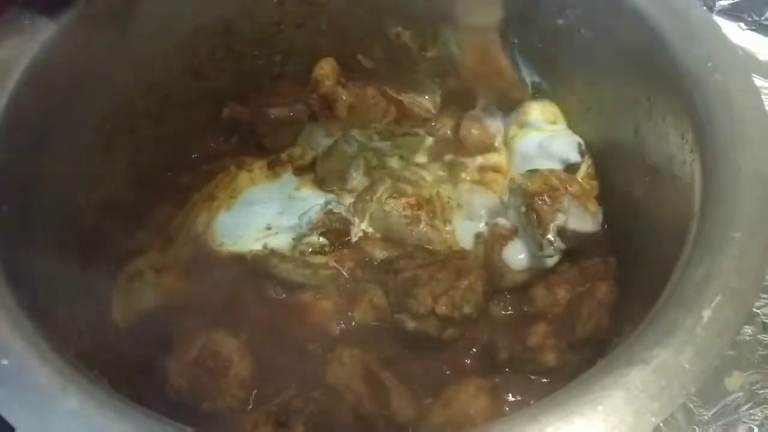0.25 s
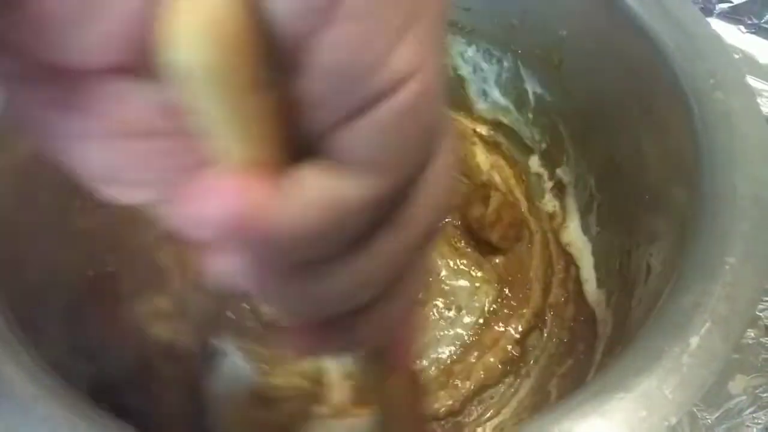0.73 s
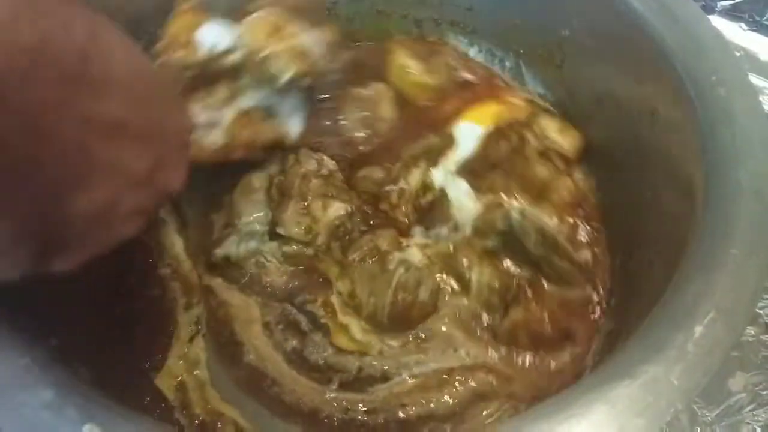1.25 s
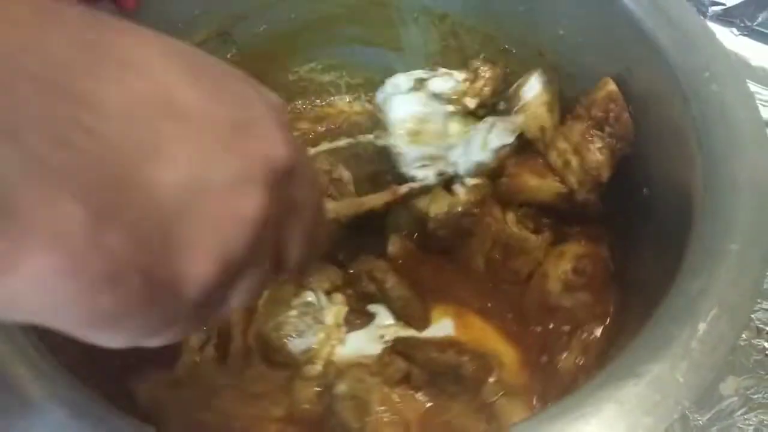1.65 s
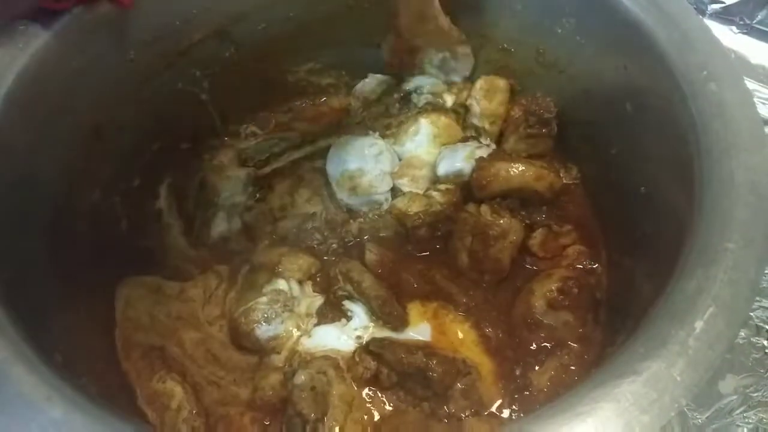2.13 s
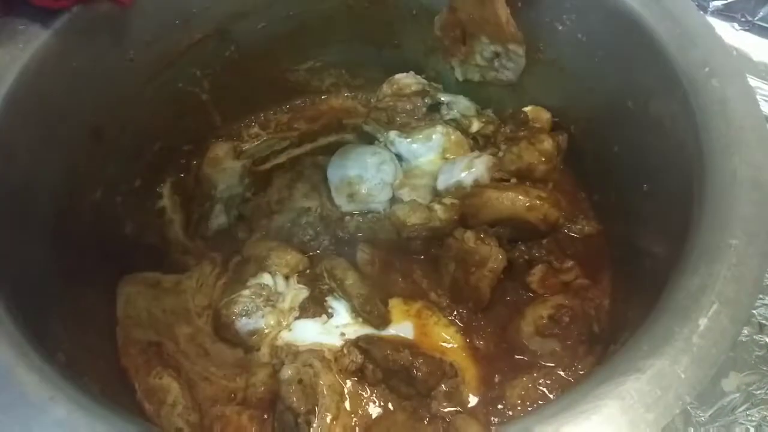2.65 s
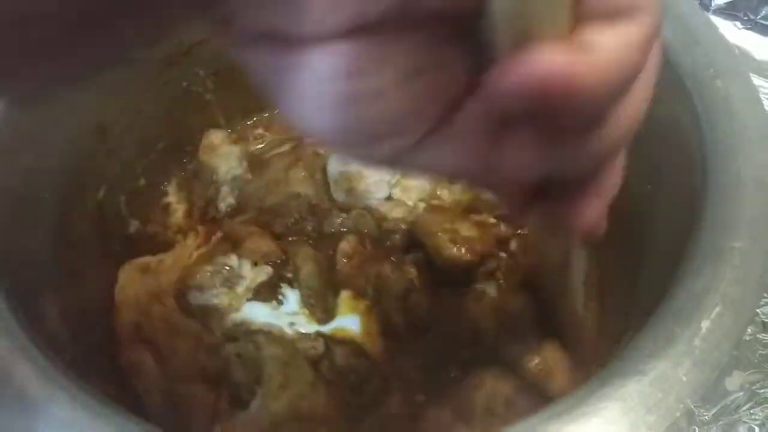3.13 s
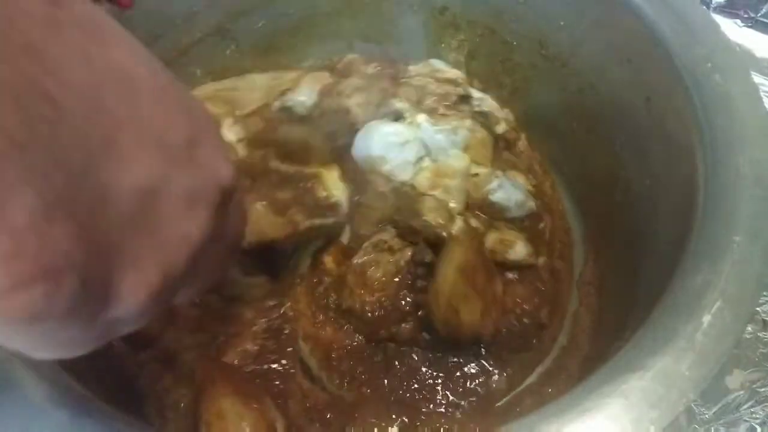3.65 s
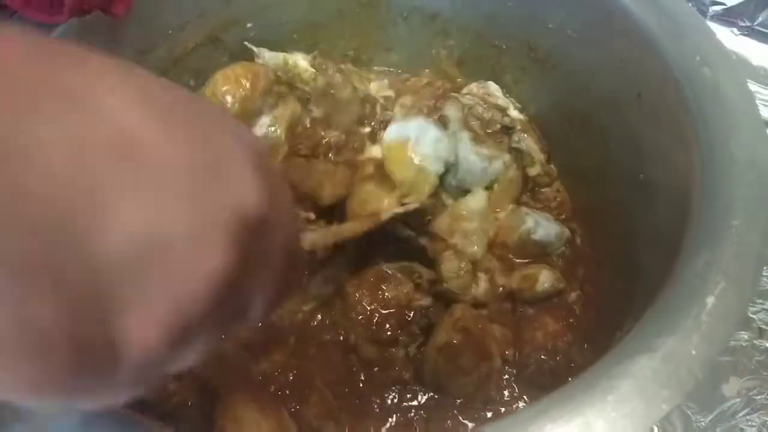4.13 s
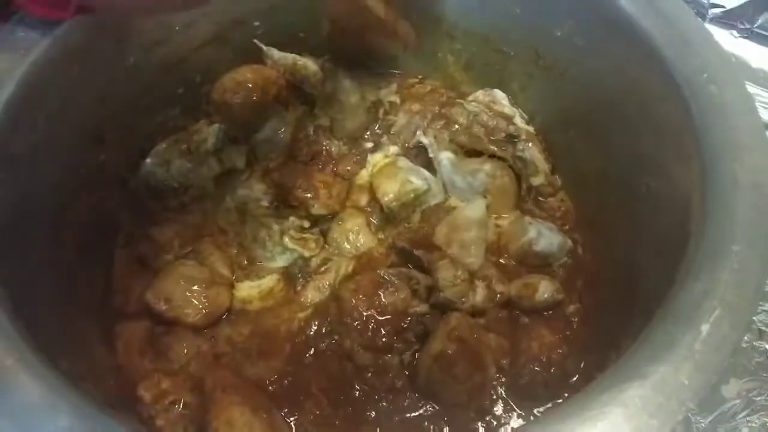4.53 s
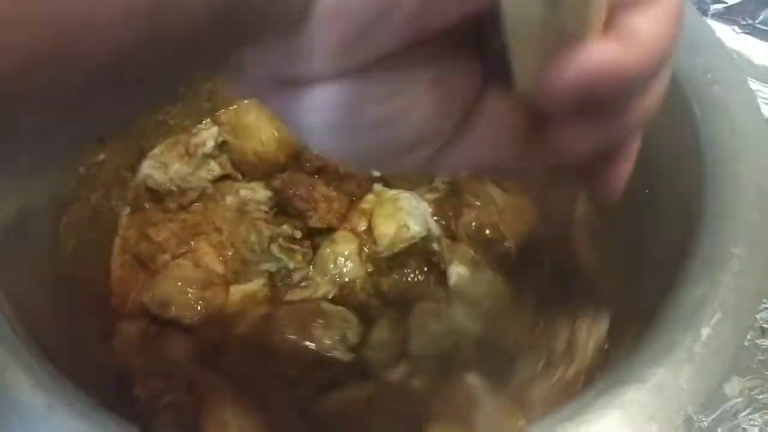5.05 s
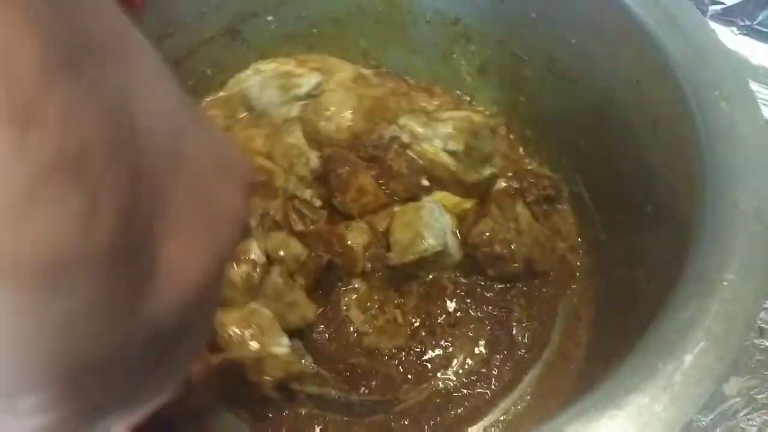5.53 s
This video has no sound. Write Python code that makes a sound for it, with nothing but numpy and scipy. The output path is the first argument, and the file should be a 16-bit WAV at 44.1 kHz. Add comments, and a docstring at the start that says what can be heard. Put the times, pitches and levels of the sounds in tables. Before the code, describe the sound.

A wooden spoon clacks and scrapes in a deep metal pot while thick meat curry sizzles, spits fat and bubbles wetly.

```python
"""In a small kitchen, a wooden spoon stirs a thick meat curry that sizzles in a deep metal pot on a stove.
The sizzle and the sliding lumps are coloured noise made of tiny bursts and brief bubble notes.
Taps, knocks and thumps are fading tones and noise; scrapes are a groan under a dry rasp.
Wet lumps plop and squelch, fat spits, large bubbles burst, and the room answers softly.
A camera with two microphone ports hangs just above the rim and turns it all into stereo."""
import sys
import numpy as np
from scipy import signal
from scipy.fft import rfft, irfft, next_fast_len
from scipy.io import wavfile
from scipy.ndimage import uniform_filter1d, map_coordinates

SR = 44100
rng = np.random.default_rng(int(sys.argv[2]) if len(sys.argv) > 2 else 0)


def output_pcm(signal):
    """Save a mono or channel-first signal as 16-bit PCM at the path in sys.argv[1].

    Samples are clipped to [-1, 1] before scaling.
    """
    pcm = np.clip(np.atleast_2d(signal).T, -1, 1) * 32767
    wavfile.write(sys.argv[1], SR, np.round(pcm).astype(np.int16))


N = 255773
TIME = np.arange(N) / SR  # the whole scene [s]
AGE = TIME[:SR // 3]  # time since one short event began [s]
TOP_HZ = 13100  # the camera passes nothing much higher


def amp(db):
    """Decibels to gain."""
    return 10 ** (np.asarray(db) / 20)


def unit(x):
    """Scaled to an average (rms) strength of 1."""
    return x / np.sqrt(np.mean(x ** 2) + 1e-20)


def along(points, hz):
    """Read a curve of (frequency [Hz], value) points on a log frequency axis."""
    f, v = np.transpose(points)
    return np.interp(np.log(hz + 1), np.log(f + 1), v)


def wobble(rate):
    """A smooth random curve with rate knots a second."""
    knots = rng.standard_normal(int(N * rate / SR) + 4)
    return map_coordinates(knots, [TIME * rate])


def filtered(x, response):
    """Reshape the spectrum of x by a response that depends on frequency."""
    m = next_fast_len(N + SR // 2)
    return irfft(rfft(x, m) * response(np.fft.rfftfreq(m, 1 / SR)), m)[..., :N]


def low_cut(x, hz):
    """A small body radiates little below hz."""
    return signal.sosfilt(signal.butter(3, hz, "high", fs=SR, output="sos"), x)


def add(track, s, sound):
    """Mix a sound into a track at s seconds."""
    part = track[..., round(s * SR):][..., :sound.shape[-1]]
    part += sound[..., :part.shape[-1]]


def fade(t60):
    """A decay that loses 60 dB in t60 seconds."""
    return np.exp(-np.log(1000) * AGE / t60)


def onset(rise):
    """A soft start with a time constant of rise seconds."""
    return 1 - np.exp(-AGE / rise)


def ring(modes, hardness_db, tuning=1):
    """Fading tones of a struck body, at new strengths each time; a harder blow favours the high ones."""
    hz, db, t60 = np.transpose(modes)[..., None]
    tilt_db = hardness_db * np.log2(hz / 500)
    strength = amp(db + tilt_db + rng.standard_normal(hz.shape))
    return np.sum(strength * fade(t60) * np.sin(2 * np.pi * hz * tuning * AGE), axis=0)


def surges(rows, t60, attack):
    """The level of short gushes that start fast and die away."""
    flow = np.zeros(N)
    for s, db in rows:
        add(flow, s, amp(db + 11.0) * fade(t60) * onset(attack))
    return flow


def gesture(start, end, rise, fall):
    """An envelope that rises from start, holds and dies away after end; rise and fall are time constants."""
    rising = 1 - np.exp(-np.maximum(TIME - start, 0) / rise)
    return rising * np.exp(-np.maximum(TIME - end, 0) / fall)


# air resonances of the open pot: (frequency [Hz], width [Hz], gain [dB])
AIR_IN_POT = [(404, 51, 8), (504, 28, -7), (851, 105, 9.5), (956, 250, -0.5), (1206, 140, 8.5),
              (1620, 400, 7.5), (1830, 49, 5), (2480, 41, 9), (2740, 120, 4.5)]


def in_pot(x, spectrum):
    """Noise given its own colour and that of the resonating air in the pot, at rms 1."""
    def colour_db(f):
        air_db = sum(db / (1 + (2 * (f - hz) / width) ** 2) for hz, width, db in AIR_IN_POT)
        return along(spectrum, f) + air_db
    return unit(filtered(x, lambda f: amp(colour_db(f))))


def crackle(rate, life, spread_db, share):
    """Tiny bursts, rate a second, each fading in life seconds, over a bed of steady noise, at both ports."""
    sizes = (rng.random(N) < rate / SR) * amp(spread_db * np.clip(rng.standard_normal(N), -2, 2))
    power = np.abs(signal.fftconvolve(sizes ** 2, fade(life) ** 2)[:N])
    # the share of the power that goes to the bursts
    share = np.clip(share, 0, 1)
    return rng.standard_normal((2, N)) * np.sqrt(1 - share + share * power / power.mean())


def froth(count, centre_hz, octaves, cycles):
    """Many small bubbles, each a brief note with its own pitch, and its own phase at each port."""
    starts = rng.integers(0, N, (count, 1))
    pitch, size = np.clip(rng.standard_normal((2, count, 1)), -2, 2)
    hz = centre_hz * 2 ** (octaves * pitch)
    t = AGE[AGE < 4 * cycles / centre_hz]
    decay = np.exp(-t * hz / cycles)
    shell = amp(2 * size) * np.sqrt(hz) * decay * (1 - np.exp(-t * hz))
    places = (starts + np.arange(len(t))).ravel()
    ports = [shell * np.sin(2 * np.pi * (hz * t + phase)) for phase in rng.random((2, count, 1))]
    return np.array([np.bincount(places, notes.ravel(), N)[:N] for notes in ports])


def patchy(x, depth_db):
    """Bubbles come in clusters, so each pitch region swells and sinks by itself."""
    z = signal.stft(x, nperseg=512)[2]
    field = rng.standard_normal(z.shape[1:])
    field = uniform_filter1d(field, size=7, axis=0)  # smooth over frequency
    field = uniform_filter1d(field, size=8, axis=1)  # smooth over time
    swollen = z * amp(depth_db * unit(field))
    return unit(signal.istft(swollen, nperseg=512)[1][:, :N])


# how hard the curry fries: (time [s], heat [dB])
FRYING_HEAT = [(0, -7), (.4, -5.5), (1.25, -9.5), (1.85, -3.5), (2.85, -3), (3.7, -0.5), (5.8, 0.5)]
# the spoon ploughs through the food:
# (start [s], end [s], lift of the sauce's sounds [dB], lift of the fizz [dB])
SPOON_STROKES = [(0.44, 1.058, 7.5, 10), (1.942, 2.637, 3.5, 4.5), (2.909, 3.468, 3.5, 2),
                 (5.03, 5.7, 0.5, 5)]
STROKE_RISE_S, STROKE_SETTLE_S = 0.17, 0.051  # the food gets moving, and comes to rest


def stirring():
    """The heat, and how far the moving food lifts the sauce's sounds and the fizz, all in dB."""
    heat_db = np.interp(TIME, *np.transpose(FRYING_HEAT))
    start, end, sauce_db, fizz_db = np.transpose(SPOON_STROKES)[..., None]
    moving = gesture(start, end, STROKE_RISE_S, STROKE_SETTLE_S)
    return heat_db, np.sum(sauce_db * moving, axis=0), np.sum(fizz_db * moving, axis=0)


# colour of the simmer: (frequency [Hz], level [dB])
SIMMER_COLOUR = [(150, -45), (400, -2.5), (700, -4), (1300, -8.5), (2000, -9.5), (2700, -2), (4500, -4),
                 (8000, -12.5), (13000, -33)]
SIMMER_DB, SIMMER_GROWS = -43, 1.03  # level at 0 dB of heat; dB gained per dB of heat


def simmer():
    """Steam breaks through the sauce as soft crackle, with a burble of low bubble notes."""
    heat_db, stirred_db, _ = stirring()
    level_db = SIMMER_DB + SIMMER_GROWS * heat_db + stirred_db + 0.75 * wobble(25)
    steam = unit(crackle(rate=600, life=.007, spread_db=4, share=.38))
    burble = unit(froth(count=1800, centre_hz=1100, octaves=.5, cycles=6))
    return amp(level_db) * in_pot(patchy(steam + .28 * burble, depth_db=1.2), SIMMER_COLOUR)


# colour of the fizz: (frequency [Hz], level [dB])
FIZZ_COLOUR = [(500, -7.5), (1800, -11), (3000, -7), (5300, -3), (7500, -5), (11000, -3.5), (13000, -6.5)]
# fresh sauce runs onto hot metal: (time [s], relative level [dB])
HISS_FLARES = [(1.16, -72), (3.255, -48), (4.295, -45), (4.44, -48), (4.7, -47), (4.97, -66), (5.35, -35),
               (5.39, -41), (5.585, -41)]
FIZZ_DB, FIZZ_GROWS = -41, 1.38  # level at 0 dB of heat; dB gained per dB of heat


def fizz():
    """Fat fizzes where the spoon bares hot metal: hiss and high bubble notes, with flares of fresh sauce."""
    heat_db, _, bared_db = stirring()
    level_db = FIZZ_DB + FIZZ_GROWS * heat_db + bared_db + 1.8 * wobble(30)
    hiss = unit(crackle(rate=900, life=.004, spread_db=5.5, share=.35))
    beads = unit(froth(count=7000, centre_hz=4200, octaves=.75, cycles=5))
    pips = unit(froth(count=260, centre_hz=3200, octaves=.3, cycles=5))
    fat = in_pot(patchy(hiss + .58 * beads + .28 * pips, depth_db=2.1), FIZZ_COLOUR)
    flares = surges(HISS_FLARES, t60=0.21, attack=0.006)
    return np.hypot(amp(level_db), flares) * fat


# colour of the sliding lumps: (frequency [Hz], level [dB])
SLUSH_COLOUR = [(20, -40), (60, -39), (120, -10.5), (200, -7.5), (290, 3.5), (420, -4.5), (700, -5.5),
                (1500, -33)]
# a lump of meat flops over: (time [s], relative level [dB])
MEAT_FLOPS = [(.495, -52.5), (1.905, -42), (2.12, -56), (2.76, -51), (3.215, -47.5), (5.38, -61)]
SLOP_DB, SLOP_GROWS = -44.5, 1.2  # level at 0 dB of heat; dB gained per dB of heat


def slop():
    """Lumps of meat slide in the sauce as low, wet crackle, and now and then one flops over."""
    heat_db, stirred_db, _ = stirring()
    sliding = amp(SLOP_DB + SLOP_GROWS * heat_db + 0.85 * stirred_db)
    flopping = surges(MEAT_FLOPS, t60=0.53, attack=0.0071)
    lumps = crackle(rate=150, life=.03, spread_db=3, share=.25)
    return np.hypot(sliding, flopping) * in_pot(lumps, SLUSH_COLOUR)


# the spoon meets the wall: (time [s], clack relative level [dB], contact muffled above [Hz],
# clack t60 [s], note of the wood [Hz], its relative level [dB],
# main note of the wall at that spot [Hz], its ring relative level [dB])
SPOON_TAPS = [(0.421, -40, 12100, 0.025, 3000, -50, 675, -52),
              (0.5087, -23.5, 16000, 0.013, 2700, -39, 688, -36),
              (0.9160, -16.5, 9900, 0.011, 3010, -31, 695, -50),
              (.9262, -31, 7000, 0.026, 3200, -39, 695, -45),
              (1.0889, -15.5, 17000, 0.015, 2910, -28.5, 612, -30.5),
              (1.586, -26.5, 14000, 0.041, 2940, -40, 650, -40),
              (1.6, -27.5, 15000, 0.02, 3180, -41, 624, -36),
              (1.6542, -25, 13800, 0.025, 2890, -34.5, 646, -45),
              (1.6635, -31, 11000, 0.02, 2900, -41, 627, -41.5),
              (1.909, -24.5, 5430, 0.052, 2547, -28, 650, -32.5),
              (2.56, -28, 13000, 0.023, 2780, -41, 613, -65),
              (2.6265, -22.5, 6860, 0.04, 3850, -34.5, 613, -47),
              (2.6365, -21, 4500, 0.01, 2630, -35.5, 610, -42)]
# colour of wood on metal: (frequency [Hz], level [dB])
CLACK_COLOUR = [(60, -74), (300, 8.5), (900, -9.5), (1800, -2.5), (2800, -3.5), (4000, 3), (5500, 1.5),
                (8000, -8), (13000, -6)]
# tones of the pot's wall, damped by the food: (frequency [Hz], level [dB], t60 [s])
WALL_MODES = [(195, -15, 0.084), (616.6, 1.5, 0.15), (705, 2, 0.05), (833, -6, 0.041), (1230, -4, 0.041),
              (1600, -19, 0.063), (2520, 2, 0.047), (2680, -14, 0.069), (2970, -13.5, 0.23),
              (3640, -8, 0.05), (3820, -14, 0.092)]
WALL_NOTE_HZ = 613  # the wall's main note where its tones are left untuned
WOOD_SWELL_S = 0.003  # the spoon's own note is loudest this long after the contact
# the spoon's second note, a little lower and louder: frequency ratio and level
WOOD_SECOND_NOTE, WOOD_SECOND_NOTE_DB = 0.92, 5.5


def taps():
    """Each contact is a sharp snap and a short clack, then the brief notes of the wood and a ring of the wall."""
    clacks, rings = np.zeros((2, N)), np.zeros(N)
    swell = (AGE / WOOD_SWELL_S * np.exp(1 - AGE / WOOD_SWELL_S)) ** 2
    for s, clack_db, muffle_hz, t60, wood_hz, wood_db, wall_hz, ring_db in SPOON_TAPS:
        # a quick burst of noise with a faint tail
        burst = (fade(t60) + amp(-29) * fade(0.036)) * onset(0.0004)
        clack = burst * rng.standard_normal((2, len(AGE)))
        # the snap reaches the near (right) port directly
        add(clack, .0013, np.array([[.5], [2.6]]))
        # sauce on the spoon softens the contact
        softening = signal.butter(2, min(muffle_hz, SR / 2 - 1), fs=SR, output="sos")
        add(clacks, s, amp(clack_db + 6.0) * signal.sosfilt(softening, clack))
        phase = 2 * np.pi * wood_hz * AGE
        wood = np.sin(phase) + amp(WOOD_SECOND_NOTE_DB) * np.sin(WOOD_SECOND_NOTE * phase)
        add(rings, s, amp(wood_db) * swell * wood)
        # food clinging to the wall shifts its tones from spot to spot
        wall = ring(WALL_MODES, hardness_db=-0.5, tuning=wall_hz / WALL_NOTE_HZ)
        add(rings, s, amp(ring_db) * wall)
    return filtered(clacks, lambda f: amp(along(CLACK_COLOUR, f))) + rings


# the spoon is dragged along the wall: (start [s], end [s], groan relative level [dB],
# rasp relative level [dB], first stick-slip rate [Hz])
SPOON_DRAGS = [(1.9, 1.938, -30, -34, 690.2), (1.943, 1.966, -26, -32.5, 629.5),
               (1.974, 1.995, -15, -29.5, 630.4), (3.005, 3.038, -45, -38.5, 687.3),
               (3.062, 3.155, -34, -42, 663), (3.191, 3.294, -49, -43.5, 636)]
DRAG_ATTACK_S, DRAG_RELEASE_S = 0.013, 0.014
GROAN_SWELL_DB, SAG_HZ_PER_S = 9, 400  # as the wood bites, the groan swells and its slips slow down


def dragging():
    """Strength of the groan, strength of the rasp and stick-slip rate over all drags."""
    groan, rasp, slip_hz = np.zeros(N), np.zeros(N), np.zeros(N)
    for start, end, groan_db, rasp_db, hz in SPOON_DRAGS:
        contact = gesture(start, end, DRAG_ATTACK_S, DRAG_RELEASE_S)
        elapsed = np.clip(TIME, start, end) - start
        swell_db = GROAN_SWELL_DB * (elapsed / (end - start) - 1.5)
        groan += contact * amp(groan_db + swell_db)
        rasp += contact * amp(rasp_db)
        slip_hz = np.where(TIME >= start, hz - SAG_HZ_PER_S * elapsed, slip_hz)
    return groan, rasp, slip_hz


# extra colour of the rasp: (frequency [Hz], level [dB])
RASP_COLOUR = [(1200, -19), (2400, 10.5), (3300, 5.5), (5000, -1), (12000, -8)]
HUM_DB = -0.5  # the pot's hum over the rasp


def scrape():
    """Wood sticks and slips along the wall: a wavering groan under a dry rasp that sets the pot humming."""
    groan_gain, rasp_gain, slip_hz = dragging()
    phase = 2 * np.pi * np.cumsum(slip_hz * (1 + .025 * wobble(200))) / SR
    groan = np.sqrt(2) * np.sin(phase) * amp(1.6 * wobble(130))
    # the crackle of the slips pulses in step with the groan
    slips = crackle(rate=600, life=.004, spread_db=3, share=.5) * (1 + .5 * np.sin(phase))
    hum = unit(signal.fftconvolve(slips[0], ring(WALL_MODES, hardness_db=-7.5))[:N])
    dry_slips = low_cut(in_pot(slips, CLACK_COLOUR), hz=1000)
    rasp = unit(filtered(dry_slips, lambda f: amp(along(RASP_COLOUR, f))))
    return groan_gain * groan + rasp_gain * (rasp + amp(HUM_DB) * hum)


def blows(rows, modes):
    """Blows with a soft start that set the fading tones of a heavy body ringing."""
    track = np.zeros(N)
    for s, db, hardness_db in rows:
        add(track, s, amp(db) * ring(modes, hardness_db) * onset(0.0039))
    return track


# blows that make the pot's bottom boom: (time [s], relative level [dB], hardness [dB per octave])
BOTTOM_KNOCKS = [(2.637, -4, 9), (2.6455, -8, -12), (2.6635, -34, 23)]
# tones of the loaded bottom: (frequency [Hz], level [dB], t60 [s])
BOTTOM_MODES = [(195, -26, 0.04), (618, 0, 0.045), (699, 0, 0.022), (806, 2, 0.011), (930, -27, 0.011),
                (1700, -25.5, 0.015)]


def knocks():
    """The bottom of the pot, loaded with food, booms with short, heavily damped tones."""
    return blows(BOTTOM_KNOCKS, BOTTOM_MODES)


# the pot rocks on its stand: (time [s], relative level [dB], hardness [dB per octave])
STAND_THUMPS = [(0.914, -47.5, -5), (3.8538, -15, -3), (3.8617, -28, 0), (3.8696, -40, 8),
                (4.38, -48, -3.5), (4.747, -46, -10.5), (5.745, -31.5, 4.5), (5.785, -35, -2)]
# tones of the pot on its stand: (frequency [Hz], level [dB], t60 [s])
STAND_MODES = [(141.5, -8.5, 0.11), (233, -8, 0.083), (256, 5, 0.046), (318, -3, 0.086), (373, 3, 0.059),
               (473, -9, 0.093), (604.7, -16.5, 0.28), (641, 7, 0.034), (704, -12, 0.08), (855, -15, 0.17),
               (1040, -15, 0.062)]


def thumps():
    """The pot rocks and thumps on its stand, which rings with low, fading tones."""
    return blows(STAND_THUMPS, STAND_MODES)


# a lump drops into the sauce: (time [s], relative level [dB])
LUMP_PLOPS = [(4.8765, -17), (4.914, -28)]
# the hollow that a lump makes in the sauce: (frequency [Hz], level [dB], t60 [s])
HOLLOW_MODES = [(297, -4, 0.036), (388, 0, 0.036), (747, -7, .03), (798, -1, 0.04), (1150, -14, .02)]


def plops():
    """A falling lump opens a hollow in the sauce, which rings dully and closes."""
    track = np.zeros(N)
    for s, db in LUMP_PLOPS:
        add(track, s, amp(db) * ring(HOLLOW_MODES, hardness_db=-3.5) * onset(0.0029))
    return track


# wet sauce squelches behind the spoon: (time [s], relative level [dB])
WET_SQUELCHES = [(4.885, -40), (5.37, -39.5), (5.445, -36), (5.563, -51)]


def squelches():
    """Short clumps of wet crackle, as sauce sucks and closes behind a lump."""
    wet = crackle(rate=500, life=.006, spread_db=3, share=.6)
    flow = surges(WET_SQUELCHES, t60=.25, attack=.009)
    # colour: (frequency [Hz], level [dB])
    colour = [(150, -52), (400, 3.0), (900, -8.5), (1450, -12.0), (3000, -11.5), (8000, -17.0)]
    return flow * in_pot(wet, colour)


# drops of fat spit and pockets of steam pop: (time [s], peak level [dB], centre [Hz])
FAT_SPITS = [(0.4255, -22, 5000), (0.5066, -23, 7000), (0.5407, -27, 7000), (0.9673, -26, 8000),
             (1.0249, -19.5, 6500), (1.362, -31.5, 7000), (1.3876, -24, 5960), (1.748, -29, 7000),
             (1.89, -24, 4500), (2.121, -36, 3500), (2.2203, -20.5, 3600), (2.3534, -30, 2750),
             (2.5022, -18, 3520), (2.5695, -19, 7500), (2.925, -28, 2800), (3.1287, -18, 2750),
             (3.256, -32, 3430), (4.4408, -33, 3900), (4.5178, -20, 6000), (4.7223, -23, 3100),
             (5.1873, -17, 8000), (5.353, -17.5, 5940), (5.451, -14.5, 1370), (5.5463, -28, 3400),
             (5.567, -22, 1350), (5.5886, -18.5, 5500)]
SPIT_OCTAVES = 1.1  # half width of a pop's band
SPIT_ECHO_DB, SPIT_ECHO_S = -15, .012  # level and t60 of its scatter, before the band is cut out


def spits():
    """A film of fat or sauce tears: one sharp pulse, duller for a large pocket, then its scatter in the pot."""
    track = np.zeros((2, N))
    for s, db, hz in FAT_SPITS:
        pop = amp(SPIT_ECHO_DB) * fade(SPIT_ECHO_S) * rng.standard_normal((2, len(AGE)))
        pop[:, 0] = 1  # the pulse itself
        edges = np.clip(hz * 2. ** (SPIT_OCTAVES * np.array([-1, 1])), 1, TOP_HZ)
        pop = signal.sosfilt(signal.butter(1, edges, "band", fs=SR, output="sos"), pop)
        add(track, s, amp(db) * pop / np.abs(pop).max())
    return track


# large bubbles burst in the sauce: (time [s], relative level [dB], first pitch [Hz])
BIG_BUBBLES = [(0.898, -30, 1550), (2.971, -29, 1206), (3.457, -37, 1170), (3.594, -26.5, 1210),
               (3.76, -28.5, 850), (4.297, -34, 703), (4.632, -34, 864), (4.699, -33, 835),
               (4.765, -31, 168), (4.783, -40, 790), (5.565, -25.5, 1335), (5.744, -32, 1210),
               (5.754, -33, 160)]
BLOB_T60_S, BLOB_RISE_PER_S = 0.047, 0.6  # fade of a 1 kHz bubble; how fast its phase runs ahead


def bubbles():
    """Large bubbles burst with a short rising note; the lower ones last longer."""
    track = np.zeros(N)
    for s, db, hz in BIG_BUBBLES:
        shell = fade(BLOB_T60_S * np.sqrt(10 ** 3 / hz)) * onset(0.0024)
        note = np.sin(2 * np.pi * hz * AGE * (1 + BLOB_RISE_PER_S * AGE))
        add(track, s, amp(db - 3) * shell * note)
    return track


# how long the kitchen rings: (frequency [Hz], t60 [s])
KITCHEN_FADE = [(150, 0.23), (1000, 0.31), (4000, 0.24), (12000, 0.022)]


def kitchen(x):
    """The room's short answer: fading noise, different at each port, that starts 5 ms late."""
    hz, t, z = signal.stft(rng.standard_normal((2, SR // 2)), SR, nperseg=256)
    decay = np.exp(-np.log(1000) * t / along(KITCHEN_FADE, hz)[:, None])
    tail = signal.istft(z * decay, SR, nperseg=256)[1]
    tail = np.pad(tail / np.linalg.norm(tail[0]), ((0, 0), (SR // 200, 0)))
    return signal.fftconvolve(x, tail, axes=1)[:, :N]


def scene():
    """Food, spoon, stand and room are summed, then made stronger at the right port than at the left."""
    spoon = low_cut(taps() + scrape() + knocks(), hz=178)
    # before that tilt, the thumps are raised at the left port and lowered at the right [dB]
    stand = low_cut(thumps(), hz=115) * amp([[1.8], [-1.8]])
    room = kitchen(amp(-19.5) * spoon + amp(-8.5) * stand)
    food = simmer() + fizz() + slop() + plops() + squelches() + spits() + bubbles()
    pot = food + spoon + stand + room
    # the pot lies nearer to the right port: (frequency [Hz], gain at the right and loss at the left [dB])
    nearer_db = lambda f: along([(400, 1.4), (1500, 7.84), (13000, 0.46)], f)
    return filtered(pot, lambda f: amp([-nearer_db(f), nearer_db(f)]))


# how the camera mixes its ports: (frequency [Hz], share of the other port subtracted [0 to 1])
PORT_SHARE = [(150, .1), (500, .4), (1000, .95), (2200, 1), (4400, .85), (6500, .52), (13000, .44)]
# travel between the ports: (frequency [Hz], delay [s])
PORT_LAG = [(1000, .000463), (2120, .000472), (3260, .000459), (6600, .000453), (13000, .000451)]
# stereo width: (frequency [Hz], gain of the left-right difference [dB])
STEREO_WIDTH = [(40, 11), (130, -2.5), (600, -8), (1400, -1), (13000, 0.5)]


def record(dry):
    """Each channel is one port minus the delayed other one; then the width is set and the top cut off."""
    share = lambda f: np.clip(along(PORT_SHARE, f), 0, 1)
    lag = lambda f: np.exp(-2j * np.pi * f * along(PORT_LAG, f))
    other = filtered(dry[::-1], lambda f: share(f) * lag(f))
    left, right = filtered(dry - other, lambda f: 1 / np.hypot(1, share(f)))
    mid = (left + right) / 2
    side = filtered((left - right) / 2, lambda f: amp(along(STEREO_WIDTH, f)))
    stereo = np.array([mid + side, mid - side])
    return filtered(stereo, lambda f: np.clip((TOP_HZ - f) / 200 + .5, 0, 1))


dry = scene()
out = record(dry)
output_pcm(out)
```